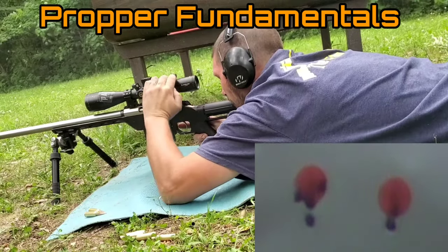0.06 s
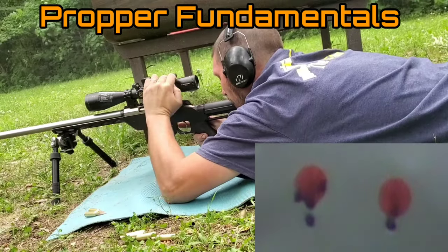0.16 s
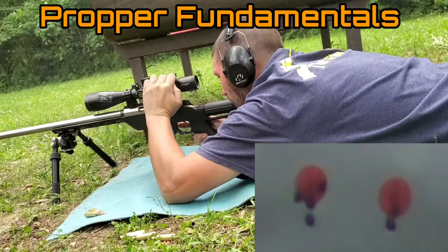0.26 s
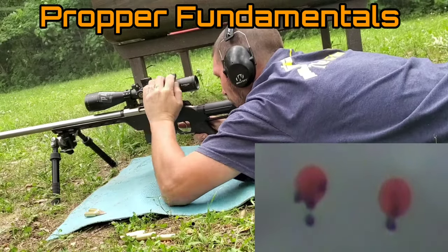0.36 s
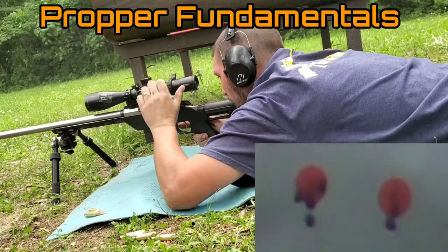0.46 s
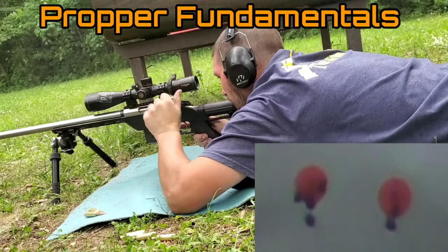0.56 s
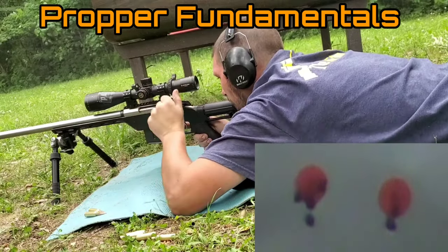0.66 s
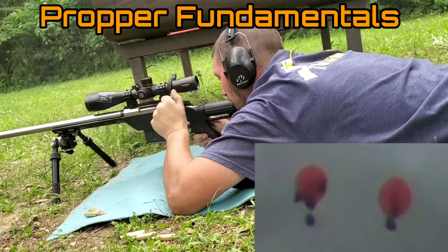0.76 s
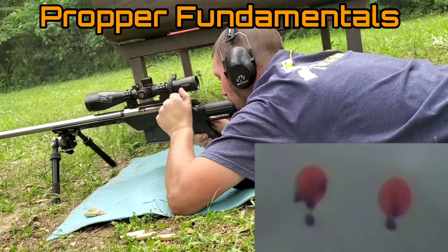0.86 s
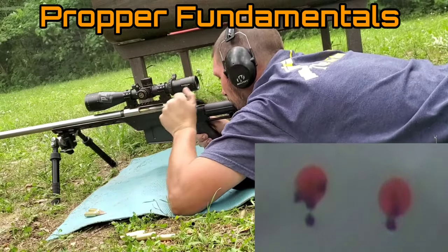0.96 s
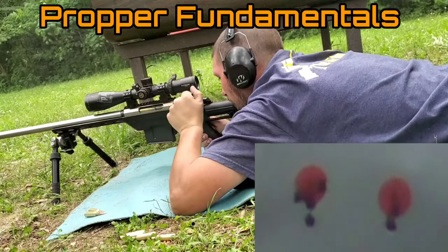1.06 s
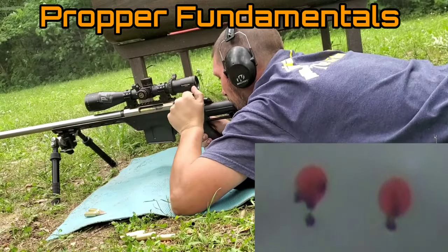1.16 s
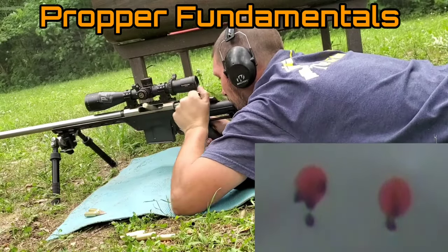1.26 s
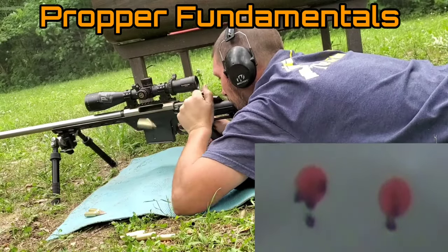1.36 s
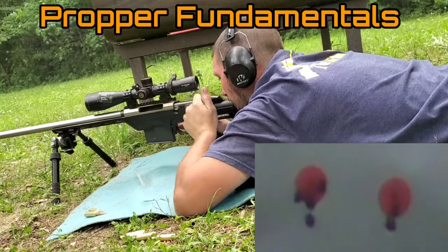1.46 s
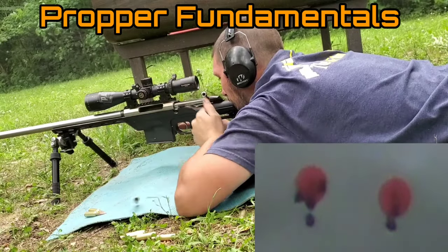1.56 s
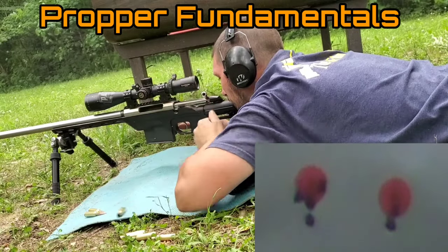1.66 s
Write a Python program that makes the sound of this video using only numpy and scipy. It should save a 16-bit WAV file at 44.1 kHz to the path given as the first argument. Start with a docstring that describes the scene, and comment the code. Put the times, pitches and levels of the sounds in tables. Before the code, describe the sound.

Bolt-action rifle cycled by hand: crisp double snap, metallic clacks, locking click, soft final thud

```python
"""On a lawn, a little to the left, the bolt of a rifle is worked: it is lifted with a double snap,
drawn back against its stop, pushed home and locked; the hand then bumps the stock.
Ringing tones and short noise bursts make the steel, and low tones make dull thuds on the mat.
An insect trills in falling whistles over a faint outdoor rumble of coloured noise.
Fading noise gives the yard's thin echo."""
import sys
import numpy as np
from scipy import signal
from scipy.fft import rfft, irfft, next_fast_len
from scipy.io import wavfile

SR = 44100
rng = np.random.default_rng(int(sys.argv[2]) if len(sys.argv) > 2 else 0)


def master(y):
    """Save y as 16-bit WAV."""
    cut = np.clip(np.atleast_2d(y).T, -1, 1)
    pcm = np.round(cut * 32767)  # scale
    wavfile.write(sys.argv[1], SR, pcm.astype(np.int16))


N = 74970  # length in samples
T = np.arange(SR // 3) / SR  # clock of one short sound, s

# how long the yard's echo takes to fade by 60 dB at each pitch: f/Hz, fade time/s
YARD_FADE = [(200, 0.34), (1000, 0.46), (4000, 0.36), (9000, 0.99), (15000, 0.23)]


def amp(db):
    """Turn decibels into a plain multiplier."""
    return 10 ** (np.asarray(db) / 20)


def unit(x):
    """Scale a sound to an average (rms) level of 1."""
    return x / np.sqrt(np.mean(x ** 2) + 1e-20)


def along(points, hz):
    """Read a curve of (f/Hz, value) points, joined by straight lines over log frequency."""
    f, value = np.transpose(points)
    return np.interp(np.log(hz + 1), np.log(f + 1), value)


def filtered(x, response):
    """Multiply each frequency in x by the gain that response gives for it."""
    n = x.shape[-1]
    padded = next_fast_len(n + 8192)  # spare room, so that the end does not wrap onto the start
    hz = np.fft.rfftfreq(padded, 1 / SR)
    return irfft(rfft(x, padded) * response(hz), padded)[..., :n]


def noise(spectrum, shape):
    """Random hiss coloured by a curve of (f/Hz, level/dB), at rms 1."""
    white = rng.standard_normal(shape)
    return unit(filtered(white, lambda hz: amp(along(spectrum, hz))))


def add(track, start_s, sound):
    """Mix a stereo sound into the track at a given time, cut off at the track's end."""
    part = track[:, round(start_s * SR):][:, :sound.shape[1]]
    part += sound[:, :part.shape[1]]


def placed(pair, left_db):
    """Even out a short stereo sound, then place it: left_db is how much louder the left is."""
    lead_s = .00034  # the left microphone is nearer, so the right one hears later
    # each side gets the energy that 5 ms at level 1 would have
    energy = np.sum(pair ** 2, axis=1, keepdims=True)
    pair = pair / np.sqrt(energy / (.005 * SR))
    left = pair[0] * amp(left_db / 2)
    right = np.interp(T - lead_s, T, pair[1], left=0) * amp(-left_db / 2)
    # the more one-sided the sound, the more it is turned down
    return np.array([left, right]) / np.sqrt(np.cosh(left_db * np.log(10) / 10))


def ring(modes, rise_s, scatter_db=2, spread=0.88):
    """Fading tones of a struck body, a little different each time and at each microphone."""
    hz, db, t60 = np.transpose(modes)[:, :, None]
    # spread (radians) sets how far the two microphones disagree in phase
    phase = rng.uniform(0, 2 * np.pi, hz.shape) + spread * rng.standard_normal((2, *hz.shape))
    level = db + scatter_db * rng.standard_normal(phase.shape)
    tones = amp(level - 60 * T / t60) * np.sin(2 * np.pi * hz * T + phase)
    rise = 1 - np.exp(-(T / rise_s) ** 2)
    return np.sum(tones, axis=1) * rise


def burst(spectrum, scrape_s, t60):
    """Resonances too crowded to tell apart: noise, fed while the parts scrape and dying after."""
    shared = 0.33  # part of the power that both microphones have in common
    common, left, right = noise(spectrum, (3, len(T)))
    pair = np.sqrt(shared) * common + np.sqrt(1 - shared) * np.array([left, right])
    fade = amp(-60 * np.maximum(T - scrape_s, 0) / t60)
    rise = 1 - np.exp(-T / (0.33 * scrape_s))
    return pair * fade * rise


def echo(x, fade_curve):
    """Many blurred reflections: x smeared by stereo noise that fades by (f/Hz, fade time/s)."""
    hz, t, grid = signal.stft(rng.standard_normal((2, SR // 2)), SR, nperseg=256)
    fade = amp(-60 * t / along(fade_curve, hz)[:, None])
    tail = signal.istft(grid * fade, SR, nperseg=256)[1]
    tail = np.pad(tail, ((0, 0), (220, 0)))  # it starts about 5 ms late
    return signal.fftconvolve(x[None], tail / np.linalg.norm(tail[0]), axes=1)[:, :N]


def air():
    """Distant rumble and hiss: coloured noise, nearly the same on both sides in the bass."""
    # colour of the outdoor air: f/Hz, relative level/dB
    air_colour = [(20, -10), (40, -3), (60, 0.84), (95, -4), (125, -3), (165, -10), (350, -15), (800, -19),
                  (2000, -22), (3600, -23), (5000, -27), (7000, -30), (9200, -35.5), (14300, -36),
                  (14800, -60)]
    # how alike left and right are: f/Hz, likeness (0 to 1)
    likeness = [(60, 1), (130, 0.86), (290, 0.87), (700, 0.36), (1500, 0), (4000, 0.12), (7000, 0.011),
                (14000, 0.29)]

    def mid_and_side(hz):
        turn = np.arccos(np.clip(along(likeness, hz), -1, 1)) / 2
        return np.array([np.cos(turn), np.sin(turn)])

    mid, side = filtered(noise(air_colour, (2, N)), mid_and_side)
    return amp(-51) * unit(np.array([mid + side, mid - side]))


def insect():
    """Every wing stroke is a short falling whistle with a rasp; grass and trees scatter it."""
    # colour of the rasp: f/Hz, relative level/dB
    rasp_colour = [(4000, -65), (4900, -7), (5300, 17), (5520, -27), (5700, 8), (6100, -17), (7500, -28)]
    strokes_per_s, first_stroke_s, stroke_width_s = 46, 0.021, 0.0044
    whistle_hz, fall_hz_per_s, scatter_hz = 5497, 15000, 36.2
    scatter_db, octave_db, rasp_db, scattered_db, trill_db = 1.3, -15.5, -5, -4, -55

    strokes = (np.arange(N) / SR - first_stroke_s) * strokes_per_s
    index = np.round(strokes).astype(int)
    age = (strokes - index) / strokes_per_s  # s from the middle of the nearest stroke
    detune, size, start = rng.standard_normal((128, 3))[index].T
    middle_hz = whistle_hz + scatter_hz * detune
    phase = 2 * np.pi * (middle_hz * age - fall_hz_per_s * age ** 2 / 2 + start)
    swell = np.exp(-(age / stroke_width_s) ** 2 / 2) * amp(scatter_db * size)
    song = unit(swell * (np.sin(phase) + amp(octave_db) * np.sin(2 * phase)))
    # the square root makes the rasp swell for longer than the whistle
    rasp = unit(np.sqrt(swell) * noise(rasp_colour, (2, N)))
    scattered = echo(song, YARD_FADE)
    scattered = scattered + 0.51 * scattered[::-1]  # some of each side leaks into the other
    return amp(trill_db) * (song + amp(rasp_db) * rasp + amp(scattered_db) * scattered)


def thuds():
    """The rifle rocks on its mat with each push of the hand: low tones that die away."""
    # the pushes: t/s, level/dB
    pushes = [(0.237, -48), (1.084, -38.5), (1.301, -45), (1.625, -39.5)]
    # low tones of one thud: f/Hz, relative level/dB, time to fade by 60 dB/s
    thud_modes = [(58, -4.5, 0.3), (109, -4, 0.094), (187, -24, 0.046)]
    out = np.zeros((2, N))
    for start_s, db in pushes:
        add(out, start_s, amp(db) * ring(thud_modes, rise_s=0.0013, scatter_db=3, spread=0.075))
    return out


def knock():
    """The stock's dull knock: a burst of mostly low and middle noise, equally loud on both sides."""
    # colour of the knock: f/Hz, relative level/dB
    knock_colour = [(60, -6), (130, -2), (250, -11), (600, -1.5), (1300, 0), (1800, -13), (4000, -17.5),
                    (9000, -23.5), (15000, -27)]
    return placed(burst(knock_colour, scrape_s=0.002, t60=0.037), 0)


def stock(left_db):
    """The stock and chassis ring in their own tones, with a dull knock underneath."""
    # stock and chassis tones: f/Hz, relative level/dB, time to fade by 60 dB/s
    stock_modes = [(488, -9, 0.037), (603, -6, 0.055), (656, -3.5, 0.066), (1123, -8.5, 0.12),
                   (1245, -9, 0.07), (1605, -7, 0.042), (2110, -13, .03)]
    return placed(ring(stock_modes, rise_s=0.0019), left_db) + amp(-5.5) * knock()


def receiver(focus_hz, rise_s, left_db):
    """The receiver rings; the point of contact favours the tones near one pitch."""
    # receiver tones: f/Hz, relative level/dB before the boost, time to fade by 60 dB/s
    receiver_modes = [(2722, -1, 0.046), (2884, 2, 0.045), (3040, -9, 0.041), (3396, -9, 0.039),
                      (3660, 1.5, 0.038), (3830, 1.5, 0.033), (4710, -4, 0.076), (5560, -13, 0.022),
                      (6000, -32, 0.03), (6160, -5, .035), (6950, -5, 0.036), (8700, -25, .045)]
    focus_octaves, focus_db = 0.21, 17.5  # width and height of the boost
    modes = []
    for hz, db, t60 in receiver_modes:
        octaves_away = np.log2(hz / focus_hz)
        boost_db = focus_db * np.exp(-(octaves_away / focus_octaves) ** 2 / 2)
        modes.append((hz, db + boost_db, t60))
    return placed(ring(modes, rise_s), left_db)


def clack(scrape_s, left_db):
    """Dense, quickly damped resonances, strongest in the middle treble."""
    # colour of the clack: f/Hz, relative level/dB
    clack_colour = [(200, -25), (700, -17.5), (2200, -11.5), (2800, -4), (3800, 0), (5500, 3.5), (7000, -6),
                    (8300, -7.5), (10500, -14.5), (15000, -41)]
    return placed(burst(clack_colour, scrape_s, t60=0.034), left_db)


def snap(scrape_s, left_db):
    """Dense, quickly damped resonances, brighter than the clack."""
    # colour of the snap: f/Hz, relative level/dB
    snap_colour = [(500, -23), (3000, -20.5), (4700, -10), (6000, -4), (6700, 2.5), (7500, -8), (8350, 0),
                   (8900, -12), (9700, -3.5), (11200, -12.5), (12600, 1), (13600, -0.5), (14400, -2.5),
                   (15200, -10)]
    return placed(burst(snap_colour, scrape_s, t60=0.026), left_db)


def ping(rise_s, left_db):
    """Small hardened parts of the bolt ring very high."""
    # small-part tones: f/Hz, relative level/dB, time to fade by 60 dB/s
    ping_modes = [(9780, -19, .03), (13350, -13, .025), (13700, -9, .025), (13940, -4, .035),
                  (14170, -2, .045), (14420, 0, .05), (14680, -7, .025)]
    return placed(ring(ping_modes, rise_s), left_db)


def spring(rise_s, left_db):
    """A thin steel part, perhaps a spring, rings on after the rest."""
    # thin-part tones: f/Hz, relative level/dB, time to fade by 60 dB/s
    spring_modes = [(9378, -2, .3), (14160, 0, .17)]
    return placed(ring(spring_modes, rise_s, scatter_db=0.0), left_db)


def handle_lock(left_db):
    """The bolt handle drops into its notch and rings briefly."""
    # handle tones: f/Hz, relative level/dB, time to fade by 60 dB/s
    handle_modes = [(2050, -20, .01), (3180, -9, .008), (3470, -2, .011), (3615, 0, .017), (3880, -9, .013)]
    return placed(ring(handle_modes, rise_s=0.00091, scatter_db=1, spread=.2), left_db)


def rifle():
    """Each contact of the bolt sounds every part of the rifle; the handle locks, the hand lands."""
    # steel contacts: t/s, scrape time/s, stock level/dB, receiver level/dB, its favoured f/Hz,
    # clack level/dB, snap level/dB, ping level/dB, spring level/dB
    contacts = [(.2277, 0.00033, -40.5, -22, 3700, -31, -20, -32, -62),
                (0.2392, 0.0027, -39, -17.5, 3320, -19.5, -19, -38, -57),
                (.2435, 0.0013, -30.5, -46, 2900, -36, -26, -46, -66),
                (.9540, .002, -52.5, -66, 3600, -46, -63, -75, -77),
                (.9660, 0.0017, -47.5, -64, 3600, -46.5, -64, -75, -77),
                (1.0595, 0.0022, -51.5, -66, 3600, -46, -69, -75, -79),
                (1.0867, 0.00055, -69, -34, 6050, -37.5, -55, -43, -61),
                (1.0940, 0.00072, -55, -31.5, 2500, -70, -57, -22, -54),
                (1.1135, 0.00083, -63, -32, 3120, -24.5, -54, -28, -66),
                (1.114, .003, -49.5, -36, 4000, -30, -26, -18.5, -43),
                (1.1380, 0.0014, -48, -37.5, 2940, -42, -64, -60, -73),
                (1.1443, 0.0015, -43.5, -36.5, 3950, -31, -60, -62, -69),
                (1.3434, 0.0013, -41.5, -25.5, 3100, -29.5, -56, -30, -33.5),
                (1.3536, 0.00051, -52, -33, 3220, -26.5, -50, -50, -49),
                (1.3935, 0.00076, -46.5, -33.5, 2860, -34.5, -45, -47, -46)]
    # how much louder each part is on the left than on the right: part, level/dB
    left_db = dict(stock=-2.5, receiver=11, clack=8.5, snap=5.5, ping=10.5, spring=-1.5)
    out = np.zeros((2, N))
    for (start_s, scrape_s, stock_db, receiver_db, focus_hz,
         clack_db, snap_db, ping_db, spring_db) in contacts:
        rise_s = scrape_s / 3
        add(out, start_s, amp(stock_db) * stock(left_db["stock"]))
        add(out, start_s, amp(receiver_db) * receiver(focus_hz, rise_s, left_db["receiver"]))
        add(out, start_s, amp(clack_db) * clack(scrape_s, left_db["clack"]))
        add(out, start_s, amp(snap_db) * snap(scrape_s, left_db["snap"]))
        add(out, start_s, amp(ping_db) * ping(rise_s, left_db["ping"]))
        add(out, start_s, amp(spring_db) * spring(rise_s, left_db["spring"]))
    add(out, 1.3927, amp(-17) * handle_lock(left_db["receiver"]))
    add(out, 1.6243, amp(-41.5) * knock())  # the hand lands on the stock
    return out


def scene():
    """The rifle with near scatter and the yard's echo, its thuds, the insect and the air."""
    ground_db, ground_fade_s, yard_db = -13.5, 0.083, -27
    background = air() + insect()
    clicks = rifle()
    source = clicks.sum(axis=0) / np.sqrt(2)
    near = amp(ground_db) * echo(source, [(1000, ground_fade_s)])  # one fade time at every pitch
    yard = amp(yard_db) * echo(source, YARD_FADE)
    return background + thuds() + clicks + near + yard


def record(dry):
    """Cut the sound very steeply above a top frequency."""
    top_hz = 14900
    return filtered(dry, lambda hz: 1 / np.sqrt(1 + (hz / top_hz) ** 120))


dry = scene()
out = record(dry)
master(out)
```